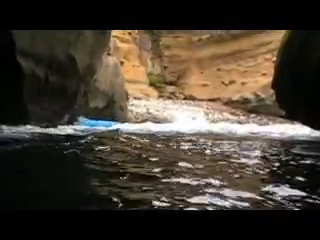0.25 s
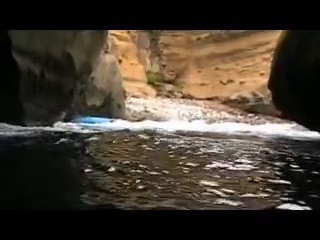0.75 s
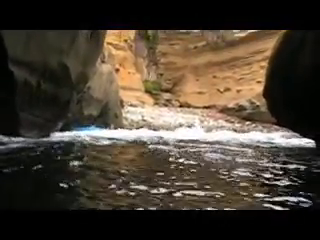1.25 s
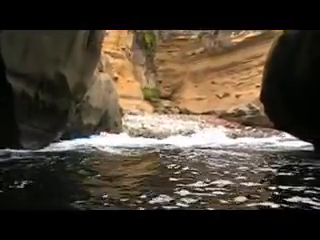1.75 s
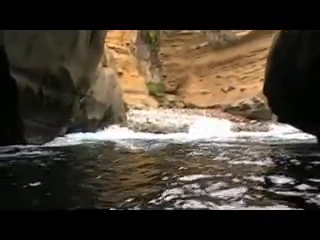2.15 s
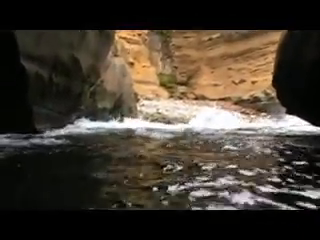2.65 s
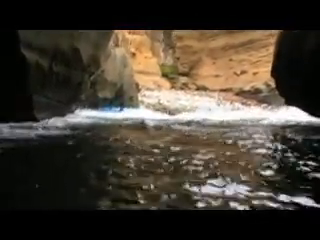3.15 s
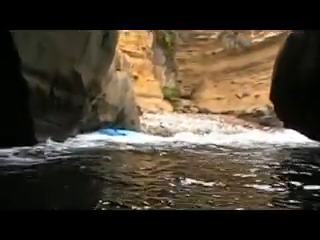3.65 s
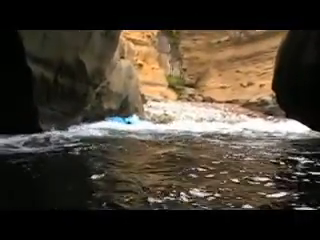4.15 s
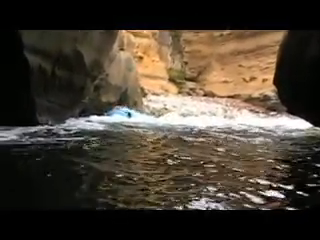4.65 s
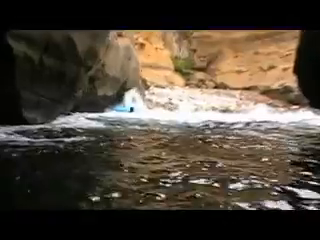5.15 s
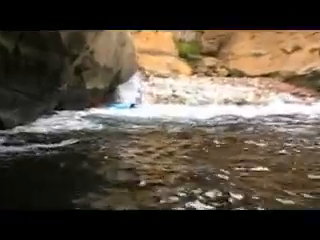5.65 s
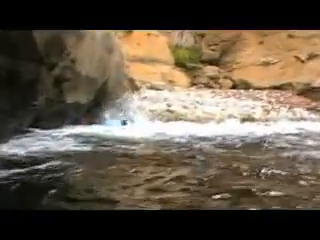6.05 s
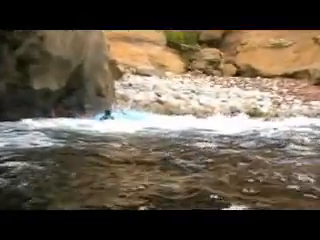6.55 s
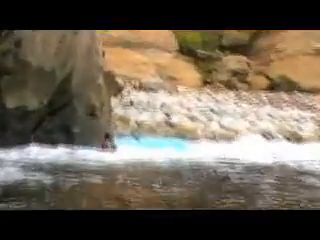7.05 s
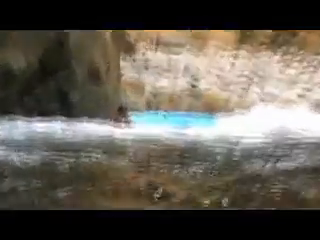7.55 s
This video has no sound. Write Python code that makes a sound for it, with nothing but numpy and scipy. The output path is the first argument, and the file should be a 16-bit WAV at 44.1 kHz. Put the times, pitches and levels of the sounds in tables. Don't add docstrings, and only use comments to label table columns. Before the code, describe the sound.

Loud, steady roar of churning whitewater over rocks inside a sea cave, with a deep airy boom and thumping wave slap near two and a half seconds.

```python
import sys
import numpy as np
from scipy import signal
from scipy.fft import rfft, irfft, next_fast_len
from scipy.io import wavfile
from scipy.ndimage import uniform_filter1d

SR = 44100
rng = np.random.default_rng(int(sys.argv[2]) if len(sys.argv) > 2 else 0)


def gain_from_db(level_db):
    decades = np.asarray(level_db, float) / 20
    return 10 ** decades


def generate_wav(sig):
    pcm = np.round(np.clip(np.atleast_2d(sig).T, -1, 1) * 32767).astype(np.int16)
    wavfile.write(sys.argv[1], SR, pcm)


N = 343098

# (time [s], flow [dB])
FLOW = [(0, -0.5), (.9, .3), (1.4, -1), (1.9, 0.2), (2.3, -0.1), (2.6, 0.6), (3.5, -1), (4.3, 0.2),
        (4.8, 0.94), (5.3, 0), (5.7, 0), (6.2, 0), (6.8, -1), (7.3, -1.1), (7.78, 0)]
# (time [s], lift [dB])
GUSHES = [(.65, 1), (4.55, 0), (4.9, 1), (5.15, 1), (5.45, 1.5), (5.57, 1.5), (6.03, 1), (6.48, 2),
          (7.55, 1), (1.85, 0.5), (4.38, 0)]
# (frequency [Hz], density [dB per Hz])
SURF_COLOUR = [(15, -37), (25, -11.5), (38, -0.5), (140, 6.5), (385, 2), (587, -7.5), (815, -10),
               (1640, -20.5), (3600, -19), (4300, -21.5), (4900, -29), (5670, -38.5), (6300, -43),
               (7000, -49), (7500, -86.5)]
# (frequency [Hz], coherence [0-1])
LIKENESS = [(25, .97), (140, .98), (400, .92), (1000, .83), (1600, .72), (3100, .76), (3900, .3),
            (4400, .47), (5100, .12), (6000, .06)]
# (frequency [Hz], t60 [s])
VAULT_T60 = [(100, 0.66), (1000, 1.22), (6000, 0.55)]
# (time [s], pressure [dB])
SWELL_PRESSURE = [(0, -38.5), (.1, -38.5), (.5, -37), (1.2, -35), (1.7, -37.5), (2, -33), (2.15, -37),
                  (2.3, -34.5), (2.7, -28), (3.4, -33), (3.9, -34.5), (5.05, -39), (5.7, -39), (6.2, -43),
                  (7.1, -44.5), (7.78, -43.5)]
# (time [s], peak [dB], pitch [Hz], swings [cycles], push or pull [+1/-1])
BREAKERS = [
    (2.315, -19, 56, 1.6, 1),
    (2.570, -7, 95, .7, 1),
    (2.652, -11, 150, .6, -1),
    (2.668, -16, 95, .9, 1),
    (2.675, -21, 40, 1.2, 1),
    (3.045, -19, 42, 1.2, 1),
    (3.31, -21, 36, 3, 1),
]
# (frequency [Hz], level [dB rms])
WHINE_LINES = [(10336, -90.5), (11714, -98)]
# (frequency [Hz], level [dB])
PORT_LEVEL = [(25, 4.5), (60, 5), (170, 2), (470, 4), (1000, 4), (2200, 4), (3700, 0), (4100, -0.5),
              (4700, 2.5), (5600, 8), (6100, 4.5), (6600, 5.5)]
# (frequency [Hz], phase [rad])
PORT_LEAD = [(20, 1.5), (55, .92), (140, .39), (300, .07), (600, -.09), (2600, -.02), (3600, -.4),
             (3900, -.8), (4150, -2.5), (4900, -2.5), (5400, -1.5)]
# (frequency [Hz], step [dB])
ROUNDING_STEP = [(4000, -110), (5400, -86), (5850, -72), (6150, -68), (6370, -65), (6400, -73), (6800, -72),
                 (7000, -68)]
# (start [s], end [s])
INTACT = [(1.625, 1.64), (1.98, 2.0), (2.955, 2.972), (4.41, 4.425), (4.545, 4.56), (5.42, 5.435),
          (6.34, 6.355), (6.725, 6.74)]
# (start [s], length [frames])
MERGED_SPELLS = [(.08, 5), (.59, 4), (.91, 3), (1.52, 3), (1.89, 2), (2.16, 3), (2.39, 4), (2.63, 3),
                 (2.81, 2), (3.19, 5), (3.7, 2), (4.49, 2), (4.76, 3), (5.05, 3), (5.23, 2), (5.46, 2),
                 (5.65, 5), (5.98, 3), (6.44, 6), (6.9, 2), (7.09, 2)]

ROAR_DB, CHURN_DB, FOAM_DB = -25, -27, -31
ROAR_DB_PER_DB, CHURN_DB_PER_DB, FOAM_DB_PER_DB = 1.6, .57, .77
GUSH_RISE_S, GUSH_FALL_S = .03, .057
CALM_DB = -38
RUMBLE_DB, RUMBLE_DB_PER_SWELL_DB, RUMBLE_DB_PER_FLOW_DB = -26.5, .2, .8
DUCK_DB_PER_DB, DUCK_S = .17, .3
FRAME_SAMPLES, FIRST_FRAME_S, STEP_BAND_HZ = 2048, .035, 240
BLIP_SHARE, WHINE_SHARE, MIRROR_SHARE = .7, .66, .36
MERGING_FREES, FOAM_COSTS_PER_DB = 2.5, .8


def whitewater():
    _, flow_db, duck_db = levels()
    near = bursts(count=30000, spread_db=3)
    far = rng.standard_normal((2, N))
    source = gain_from_db(-9.5) * near + gain_from_db(-11.5) * vault(near) + far
    source = patchy(source, patchy_db=.12)
    roar_db = ROAR_DB + ROAR_DB_PER_DB * flow_db + .6 * duck_db
    churn_db = CHURN_DB + CHURN_DB_PER_DB * flow_db + 1.2 * duck_db
    foam_db = FOAM_DB + FOAM_DB_PER_DB * flow_db + duck_db
    roar = gain_from_db(roar_db) * water(source, 170, 493)
    churn = gain_from_db(churn_db) * water(source, 567, 1600)
    foam = gain_from_db(foam_db) * water(source, 1450, 12000)
    return roar + churn + foam


def bursts(count, spread_db):
    when, size, sign = rng.random((3, 2, count))
    pops = gain_from_db(-spread_db * np.log(size + 1e-4)) * np.sign(sign - .5)
    showers = [np.bincount((w * N).astype(int), p, N) for w, p in zip(when, pops)]
    return unit(np.array(showers))


def vault(x):
    hz, t, z = signal.stft(rng.standard_normal((2, SR)), SR, nperseg=256)
    decay = gain_from_db(-60 * t / along(VAULT_T60, hz)[:, None])
    tail = signal.istft(z * decay, SR, nperseg=256)[1]
    return signal.fftconvolve(x, tail / np.linalg.norm(tail[0]), axes=1)[:, :N]


def patchy(x, patchy_db):
    z = signal.stft(x, nperseg=1024)[2]
    field = uniform_filter1d(rng.standard_normal(z.shape[1:]), size=14, axis=0)
    field = uniform_filter1d(field, size=6, axis=1)
    return signal.istft(z * gain_from_db(patchy_db * unit(field)), nperseg=1024)[1][:, :N]


def swell():
    boom_db, flow_db, _ = levels()
    rumble_db = RUMBLE_DB + RUMBLE_DB_PER_SWELL_DB * (boom_db - CALM_DB) + RUMBLE_DB_PER_FLOW_DB * flow_db
    air = rng.standard_normal((2, N))
    return gain_from_db(boom_db) * water(air, 8, 55) + gain_from_db(rumble_db) * water(air, 66, 179)


def thumps():
    out = np.zeros(N)
    t = np.arange(N) / SR
    for s, db, hz, swings, sign in BREAKERS:
        cycles = (t - s) * hz
        out += sign * gain_from_db(db) * np.exp(-(cycles / swings) ** 2) * np.cos(2 * np.pi * cycles)
    return out


def water(source, low_hz, high_hz):
    def mid_side(hz):
        turn = np.arccos(np.clip(along(LIKENESS, hz), 0, 1)) / 2
        share = np.sqrt(below(hz, high_hz) * (1 - below(hz, low_hz)))
        return gain_from_db(along(SURF_COLOUR, hz)) * share * [np.cos(turn), np.sin(turn)]

    mid, side = filtered(source, mid_side)
    return np.array([mid + side, mid - side]) / np.std(mid)


def levels():
    (boom_db,), (flow_db,) = curves(SWELL_PRESSURE), curves(FLOW)
    duck_db = -DUCK_DB_PER_DB * uniform_filter1d(boom_db - CALM_DB, size=round(DUCK_S * SR) + 1)
    t = np.arange(N) / SR
    for s, lift_db in GUSHES:
        width_s = np.where(t < s, GUSH_RISE_S, GUSH_FALL_S)
        flow_db = flow_db + lift_db * np.exp(-((t - s) / width_s) ** 2)
    return boom_db, flow_db, duck_db


def whine(kept, mirror_kept):
    (hz, db), (mirror_hz, mirror_db) = WHINE_LINES
    t = np.arange(N) / SR
    main = gain_from_db(db + 8) * kept * np.sin(2 * np.pi * hz * t)
    mirror = gain_from_db(mirror_db + 14) * mirror_kept * np.sin(2 * np.pi * mirror_hz * t)
    return main + mirror


def starved(x, scatter_db, band_db):
    hz, _, z = signal.stft(x, SR, 'cosine', 2 * FRAME_SAMPLES)
    drift = unit(uniform_filter1d(rng.standard_normal(z.shape[2]), size=2))
    band = (hz // STEP_BAND_HZ).astype(int)
    own = unit(uniform_filter1d(rng.standard_normal((band[-1] + 1, z.shape[2])), size=3))[band]
    step = gain_from_db(along(ROUNDING_STEP, hz)[:, None] + scatter_db * drift + band_db * own)
    size = np.abs(z) + 1e-12
    z = z / size * step * np.floor(size / step + .4)
    rounded = signal.istft(z, SR, 'cosine', 2 * FRAME_SAMPLES)[1][:, :N]
    return rounded + spells(INTACT, fade_s=.008) * (x - rounded)


def merged(x, merging):
    treble = filtered(x, lambda hz: (hz > 4000) & (hz < 6600))
    lift = [(4000, 3), (4350, 4.2), (5200, 2.9)]  # (Hz, dB)
    both = filtered(treble.mean(axis=0), lambda hz: gain_from_db(along(lift, hz)))
    turn = merging * np.pi / 2
    return x - treble + np.cos(turn) * treble + np.sin(turn) * both


def choices():
    first = round(FIRST_FRAME_S * SR)
    starts = np.arange(first, N, FRAME_SAMPLES)
    blip, luck = rng.random(len(starts)), rng.standard_normal(len(starts))
    spell = np.zeros(len(starts))
    for s, frames in MERGED_SPELLS:
        spell[round((s - FIRST_FRAME_S) * SR / FRAME_SAMPLES):][:frames] = 1
    lone = (blip < BLIP_SHARE) & (blip < np.roll(blip, 1)) & (blip < np.roll(blip, -1))
    merging = (spell > 0) | lone & (uniform_filter1d(spell, size=3) < .1)
    _, flow_db, duck_db = levels()
    freed = MERGING_FREES * uniform_filter1d(spell, size=5, origin=1)
    spare = luck + freed - FOAM_COSTS_PER_DB * (flow_db + duck_db)[starts]
    picks = [merging] + [spare > np.quantile(spare, 1 - share) for share in (WHINE_SHARE, MIRROR_SHARE)]
    held = np.pad(np.repeat(picks, FRAME_SAMPLES, axis=1), [(0, 0), (first, 0)])[:, :N]
    return uniform_filter1d(held * 1., size=FRAME_SAMPLES * 3 // 4)


def spells(rows, fade_s):
    on = np.zeros(N)
    for start, end in rows:
        on[round(start * SR):round(end * SR)] = 1
    return uniform_filter1d(on, size=round(fade_s * SR))


def unit(x):
    return x / np.sqrt(np.mean(x ** 2) + 1e-20)


def along(points, hz):
    f, v = np.transpose(points)
    return np.interp(np.log(hz + 1), np.log(f + 1), v)


def curves(rows):
    s, *cols = np.transpose(rows)
    return [np.interp(np.arange(N) / SR, s, c) for c in cols]


def filtered(x, response):
    m = next_fast_len(N + SR // 2)
    return irfft(rfft(x, m) * response(np.fft.rfftfreq(m, 1 / SR)), m)[..., :N]


def below(hz, edge_hz):
    return 1 / (1 + (hz / edge_hz) ** 8)


def scene():
    return whitewater() + swell() + thumps()


def low_pass(x):
    return signal.sosfilt(signal.butter(12, 11800, fs=SR, output="sos"), x)


def record(dry):
    half = np.array([[.5], [-.5]])
    ports = filtered(dry, lambda hz: gain_from_db(half * along(PORT_LEVEL, hz)) * np.exp(-1j * half * along(PORT_LEAD, hz)))
    merging, kept, mirror_kept = choices()
    treble_worn = merged(starved(ports, scatter_db=1.6, band_db=2.5), merging)
    mix = treble_worn + whine(kept, mirror_kept) * gain_from_db(half * 1.5)
    return low_pass(mix)


dry = scene()
out = record(dry)
generate_wav(out)
```